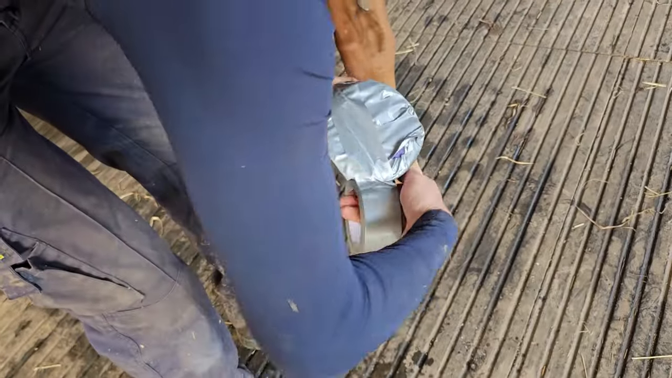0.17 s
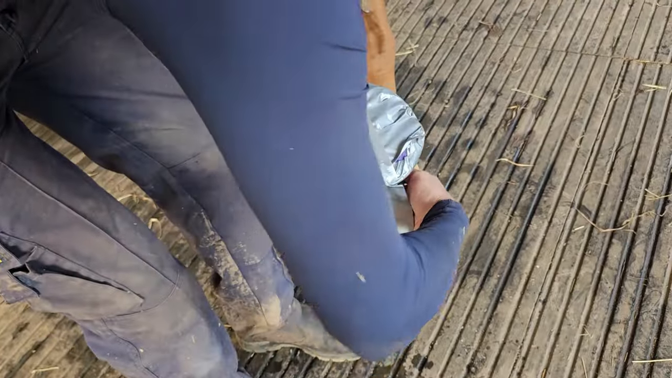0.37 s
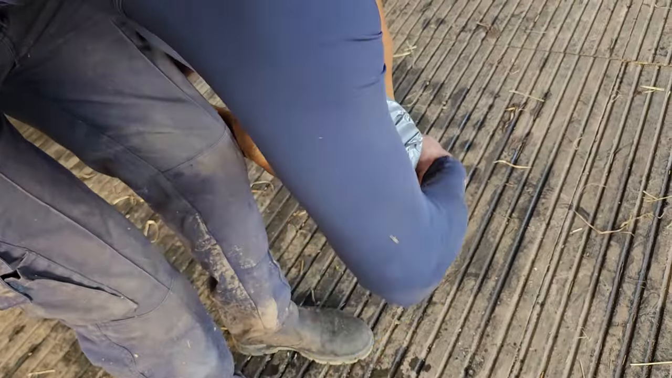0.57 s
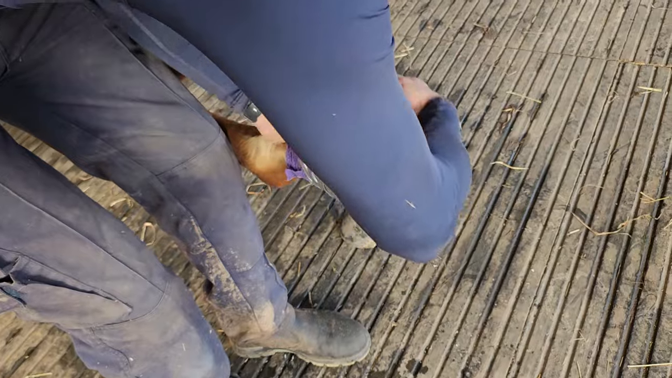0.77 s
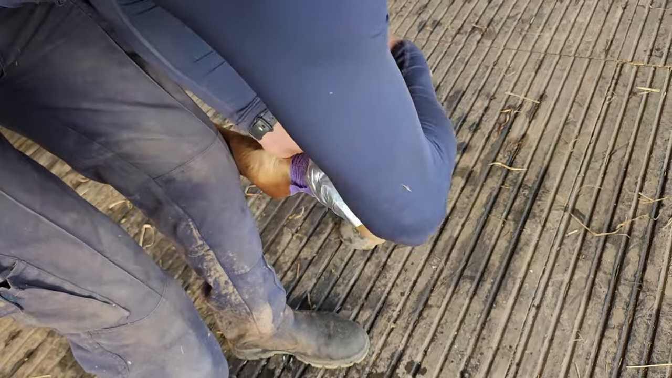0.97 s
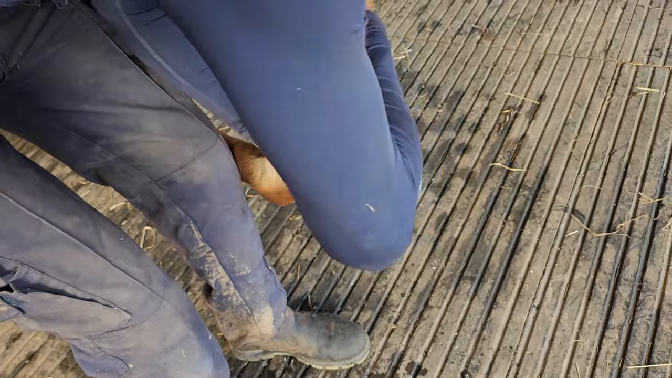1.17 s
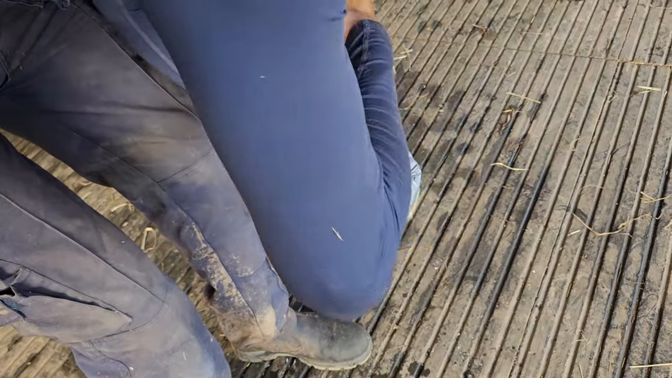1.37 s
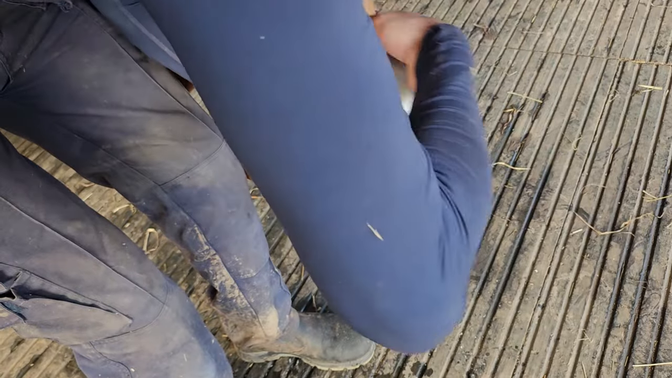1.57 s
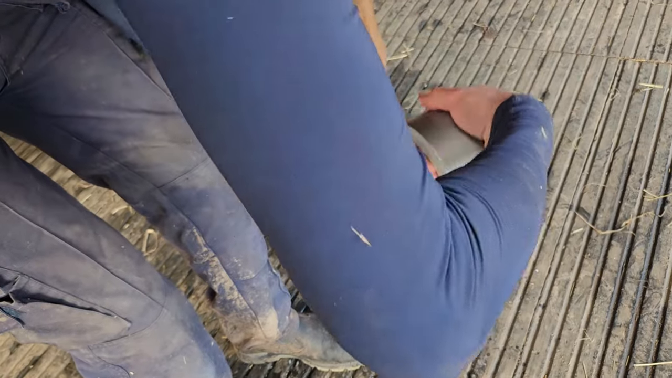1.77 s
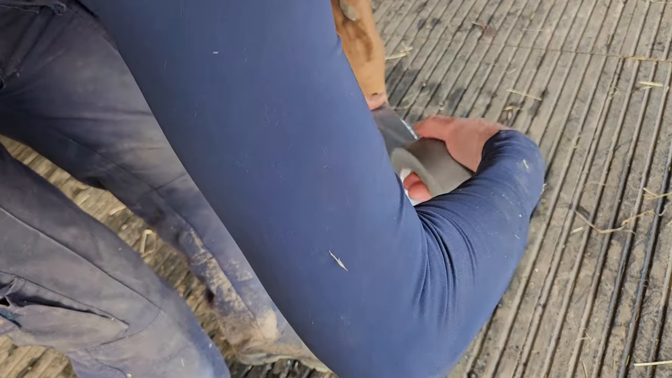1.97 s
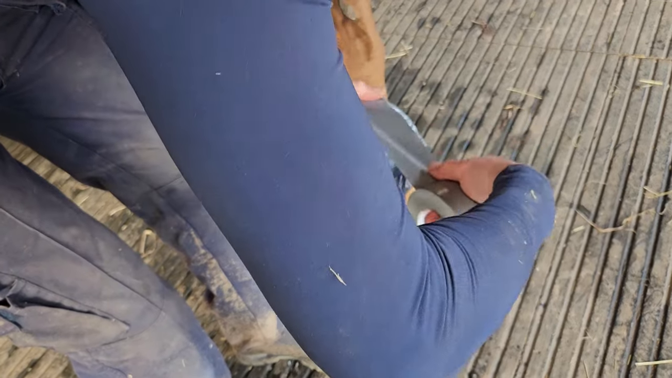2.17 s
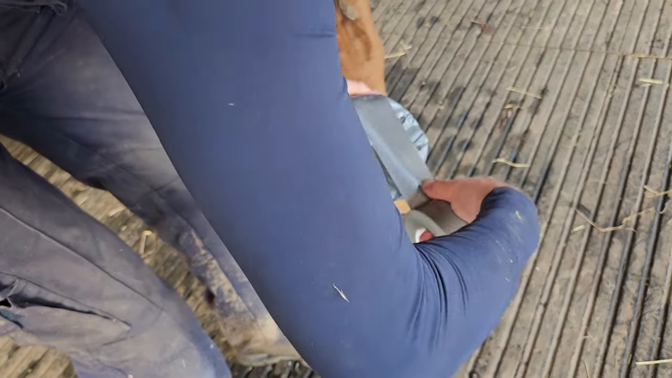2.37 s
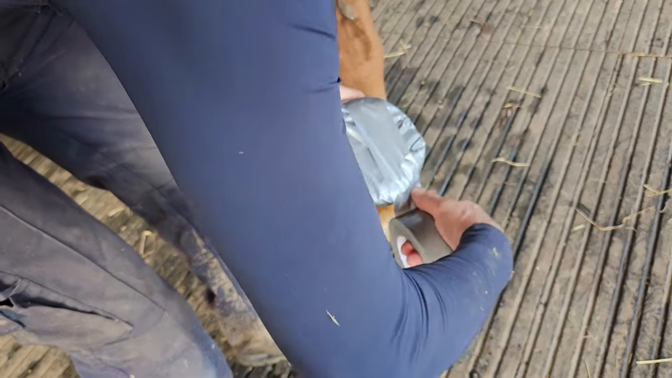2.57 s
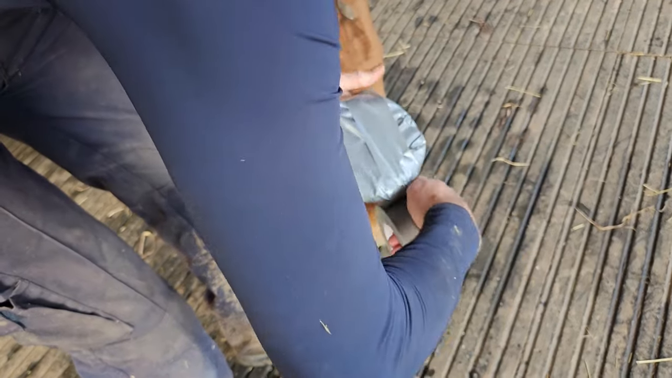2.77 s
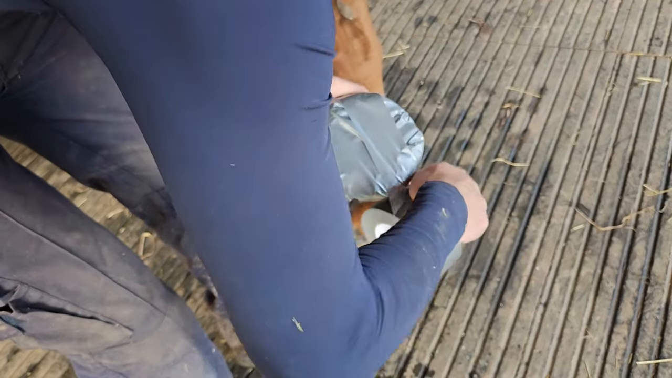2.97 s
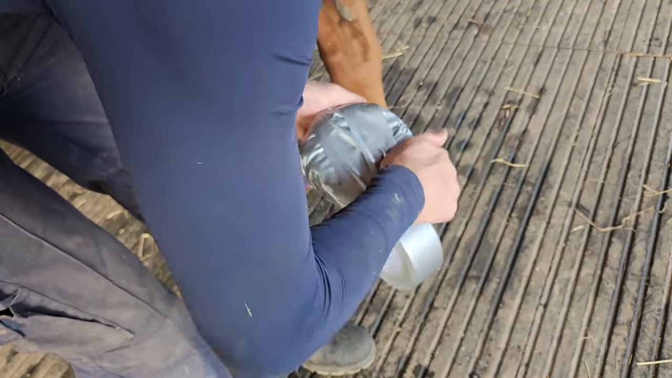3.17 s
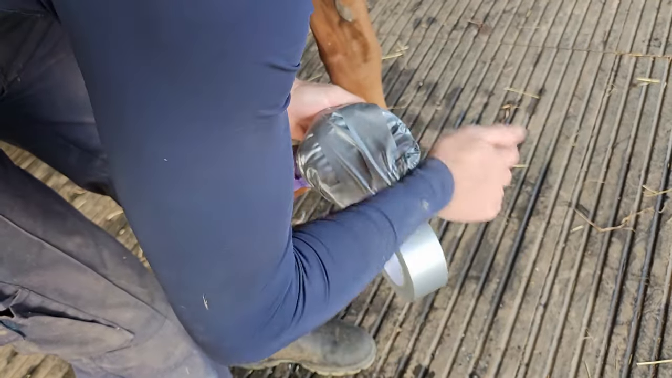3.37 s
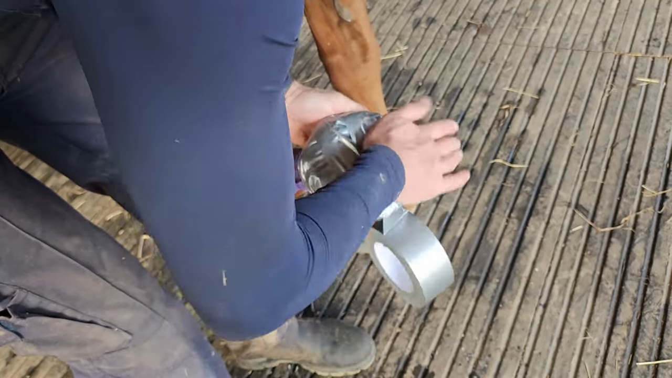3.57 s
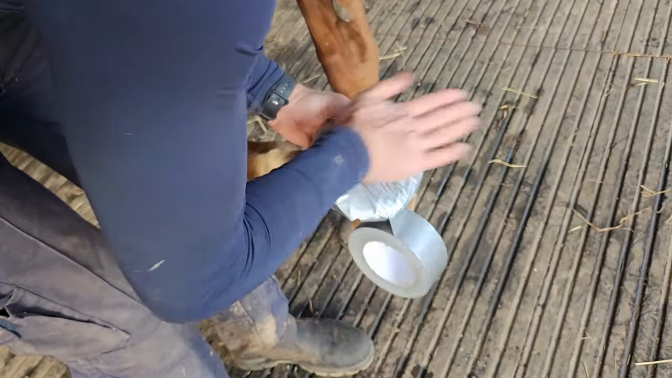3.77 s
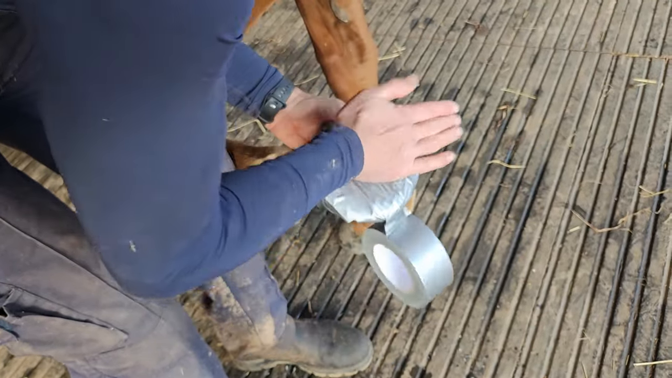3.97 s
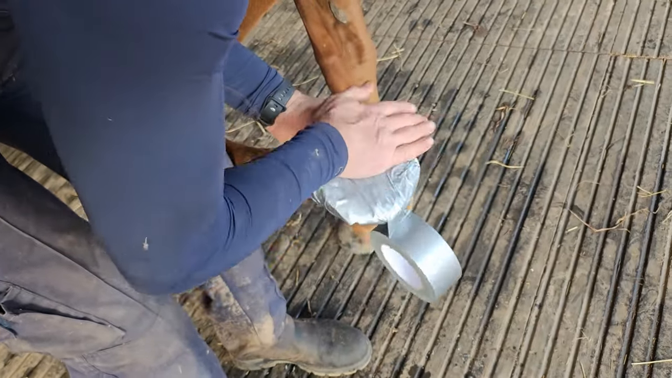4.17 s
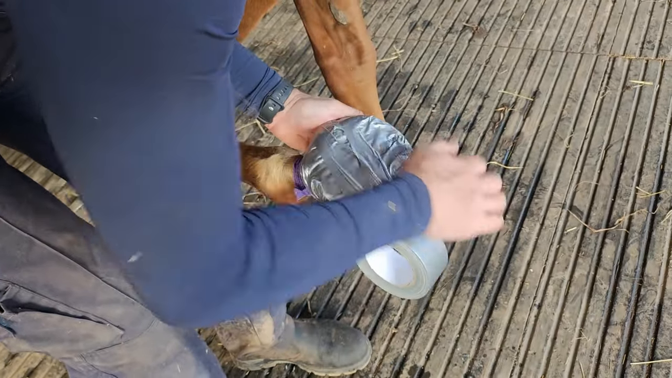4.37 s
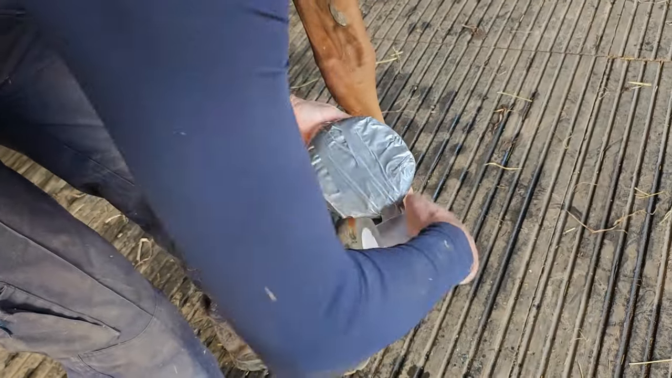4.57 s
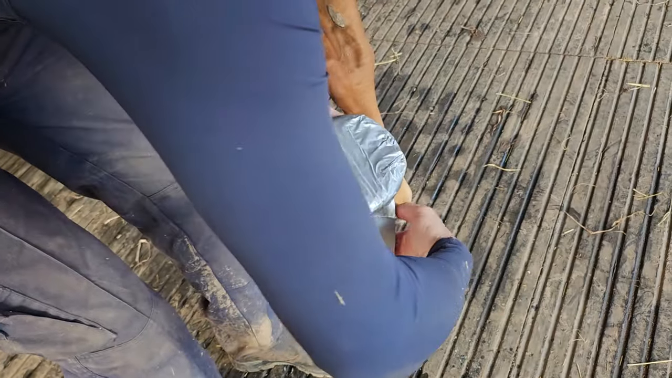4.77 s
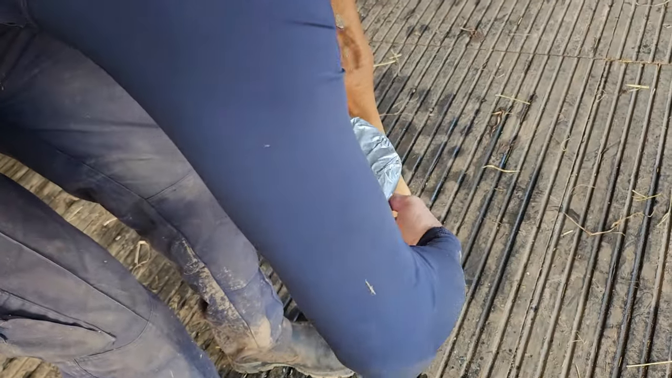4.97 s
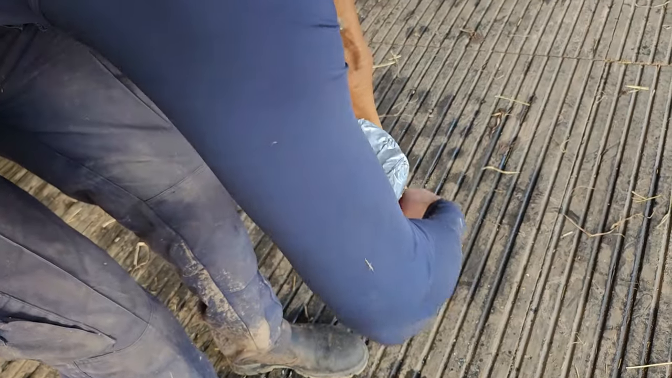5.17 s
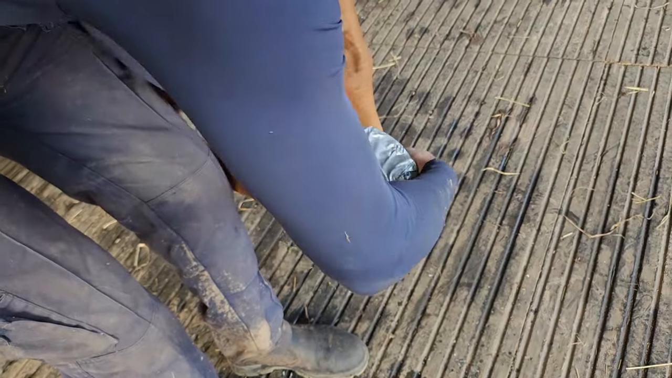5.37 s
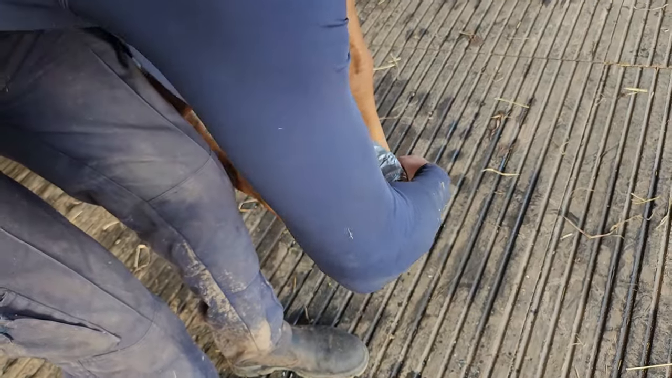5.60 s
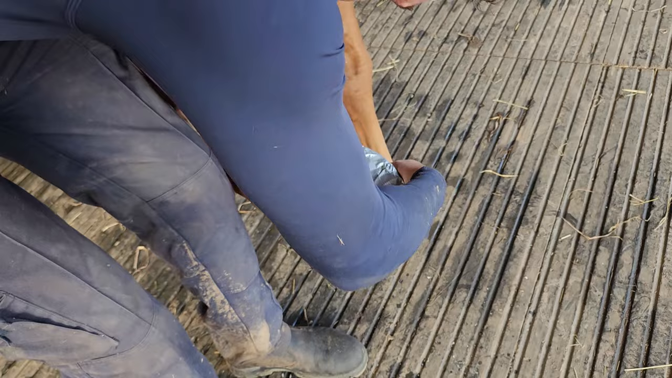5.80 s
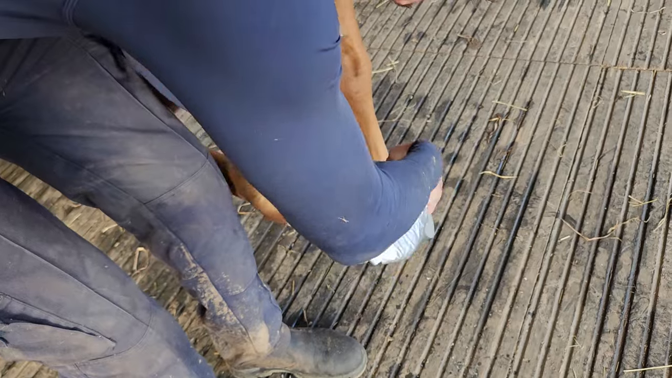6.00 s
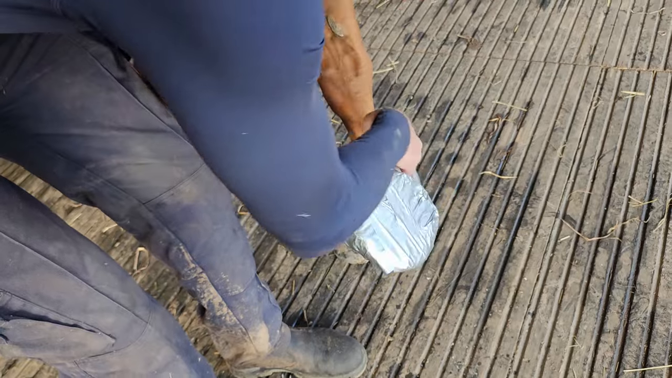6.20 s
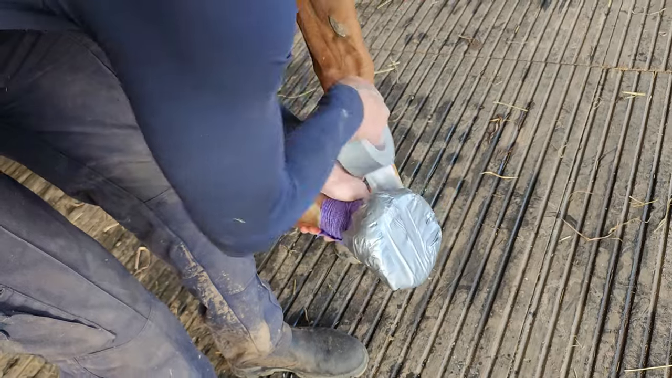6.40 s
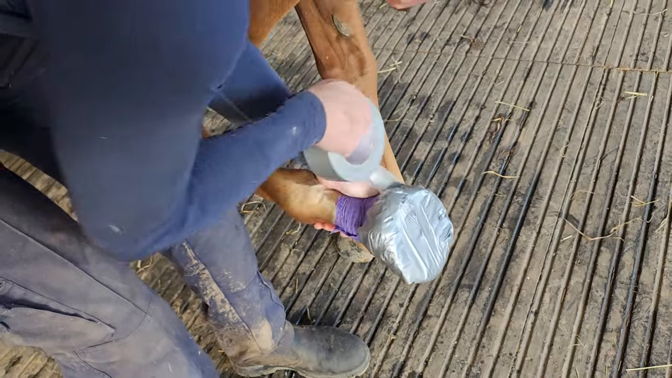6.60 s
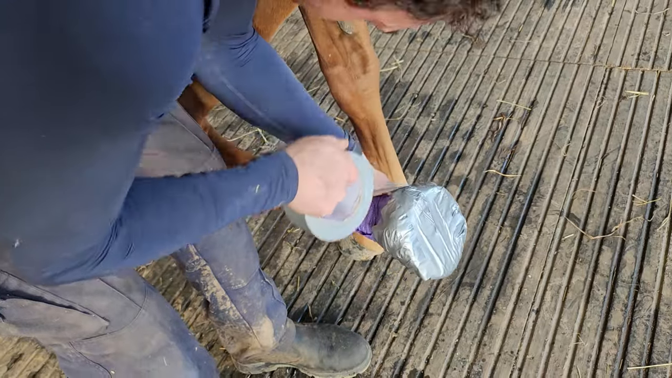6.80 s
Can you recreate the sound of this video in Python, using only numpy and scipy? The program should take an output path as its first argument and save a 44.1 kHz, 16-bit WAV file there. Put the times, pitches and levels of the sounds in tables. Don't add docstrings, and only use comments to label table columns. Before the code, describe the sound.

Close, rough ripping of sticky tape comes in uneven bursts, broken by a few pats on the wrap, cloth rustle and boot shuffle.

```python
import sys
import numpy as np
from scipy import signal
from scipy.io import wavfile
from scipy.ndimage import uniform_filter1d

SR = 44100
rng = np.random.default_rng(int(sys.argv[2]) if len(sys.argv) > 2 else 0)


def int16_out(signal):
    q = np.round(np.clip(np.atleast_2d(signal).T, -1, 1) * 32767)
    wavfile.write(sys.argv[1], SR, q.astype(np.int16))


def volts_from_db(level):
    exponent = np.asarray(level, float) / 20
    return 10 ** exponent


N = 301644


def evened(x):
    return x / np.sqrt(np.mean(x ** 2) + 1e-20)


def read(points, hz):
    f, value = np.transpose(points)
    return np.interp(np.log(hz + 1), np.log(f + 1), value)


def add(mix, s, sound):
    part = mix[round(s * SR):][:len(sound)]
    part += sound[:len(part)]


def band(x, lo_hz, hi_hz):
    return signal.sosfilt(signal.butter(2, [lo_hz, hi_hz], "band", fs=SR, output="sos"), x)


def colour(points, size=2048):
    level_db = np.maximum(read(points, abs(np.fft.fftfreq(size, 1 / SR))), -100)
    log_gain = np.log(volts_from_db(level_db))
    return np.fft.ifft(np.exp(np.conj(signal.hilbert(log_gain)))).real[:size // 2]


def resonate(x, hz, width):
    turn = np.exp(2j * np.pi * np.cumsum(hz * np.ones(len(x))) / SR)
    r = np.exp(-np.pi * width / SR)
    return 2 * (turn * signal.lfilter([1 - r], [1, -r], x / turn)).real


def swell(s, rise, fall):
    t = np.arange(N) / SR
    return volts_from_db(-20 * np.maximum((s - t) / max(rise, .005), (t - s) / max(fall, .005)))


# peak_s, rise_s, fall_s, rustle_db, shuffle_db
MOVES = [(.068, 0.091, 0.034, -47.5, -85), (.178, 0.067, 0.18, -52, -43), (.39, 0.076, 0.06, -42, -56),
         (1.3, 1.8, 1.4, -64, -49.5), (2.3, 0.19, 0.58, -46, -49), (2.62, 0.19, 0.36, -54, -54.5),
         (2.9, 0.23, 0.14, -70, -47.5), (3.31, 0.092, 0.32, -51.5, -43), (3.561, 0.0069, 0.055, -51, -37.5),
         (3.75, 0.2, 0.21, -40.5, -43.5), (3.904, 0.013, 0.075, -43, -24.5), (3.96, .06, 0.39, -44.5, -35),
         (4.217, 0.016, 0.2, -45, -40), (4.579, 0.1, 0.25, -55, -76), (4.86, 0.089, 0.18, -58, -52),
         (4.96, 0.075, 0.47, -64.5, -43.5), (5.05, 0.38, 0.17, -43, -67), (5.551, 0.12, 0.67, -49.5, -65),
         (5.71, .25, 0.083, -61, -46), (5.974, 0.051, 0.098, -53, -39), (6.1, 0.13, 0.05, -42.5, -61),
         (6.35, 0.26, .06, -40, -38.5), (6.75, .4, 0.66, -70, -40.5)]
# frequency_hz, density_db (per Hz)
RUSTLE = [(300, -17.5), (600, -2), (1200, -3.5), (2500, -1.5), (5000, -5), (7000, -5), (10000, -12),
          (12000, -5), (15800, -15.5)]
# frequency_hz, density_db (per Hz)
RUMBLE = [(15, -58), (25, -10), (54, -8), (129, -4), (172, -3), (303, -14), (339, -21.5), (500, -19),
          (650, -49), (1100, -120)]
# frequency_hz, likeness (-1 to 1)
SAME = [(60, 0.81), (240, 0.98), (950, 0.34), (3770, 0.1), (15000, 0.46)]


def background():
    frames, hz = N // 128 + 6, np.fft.rfftfreq(512, 1 / SR)
    a, b, c, d, patches = rng.standard_normal((frames, 257, 5)).T
    patches = uniform_filter1d(patches, size=10, axis=0)
    patches = evened(uniform_filter1d(patches, size=12, axis=1))
    flicker = evened(uniform_filter1d(rng.standard_normal(frames), size=3))
    same = np.clip(read(SAME, hz), -1, 1)[:, None]
    left = a + 1j * b
    right = same * left + np.sqrt(1 - same ** 2) * (c + 1j * d)
    z = np.array([left, right]) * volts_from_db(1.0 * patches + 1.1 * flicker)
    hiss = signal.istft(z, nperseg=512, noverlap=384)[1][:, :N]
    rustle = evened(signal.oaconvolve(hiss, colour(RUSTLE)[None])[:, :N])
    loudness, shuffling = np.full(N, volts_from_db(-65.5)), np.full(N, volts_from_db(-87.5))
    for s, rise, fall, rustle_db, shuffle_db in MOVES:
        shape = swell(s, rise, fall)
        shuffling += volts_from_db(shuffle_db - 1.0) * shape
        loudness += volts_from_db(rustle_db - 3.5) * shape
    low = signal.oaconvolve(hiss, colour(RUMBLE, size=16384)[None])[:, :N]
    lumps = volts_from_db(2.1 * evened(uniform_filter1d(rng.standard_normal(N), size=4000)))
    rumble_level = volts_from_db(-76) + volts_from_db(-15.5) * shuffling ** 0.74
    rumble = lumps * rumble_level * evened(band(low, 22, 118))
    shuffle = shuffling * evened(band(low, 114, 480))
    return loudness * rustle + rumble + shuffle


# peak_s, rise_s, fall_s, pitch_hz, width_hz, level_db
WHINE = (4.56, .2, .1, 1340, 70, -71)


def whine():
    s, rise, fall, hz, width, db = WHINE
    whistle = evened(resonate(rng.standard_normal(N), hz, width))
    return volts_from_db(db) * np.minimum(2 * swell(s, rise, fall), 1) * whistle


# frequency_hz, t60_s
STABLE = [(150, 0.8), (600, 0.61), (2000, 0.69), (6000, 0.6), (14000, 0.39)]
# frequency_hz, tail_db
STABLE_DB = [(150, -29), (500, -27), (1500, -25.5), (5000, -21), (14000, -24)]
MONO_HZ = 648


def tail():
    taps = np.zeros((2, SR))
    at = np.arange(400, SR - 20, 20) + rng.integers(0, 20, (2, (SR - 401) // 20))
    np.put_along_axis(taps, at, rng.choice([-1., 1.], at.shape), 1)
    hz, t, z = signal.stft(taps, SR, nperseg=256)
    apart = (hz / np.hypot(hz, MONO_HZ))[:, None] ** 2
    right = apart * z[1] + np.sqrt(1 - apart ** 2) * z[0]
    z = np.array([z[0], right]) * volts_from_db(-60 * t / read(STABLE, hz)[:, None])
    z = z * np.minimum(t / 0.0034, 1)
    energy = (abs(z) ** 2).sum(2, keepdims=True).mean(0)
    z = z / np.sqrt(energy) * volts_from_db(read(STABLE_DB, hz))[:, None]
    return signal.istft(z, SR, nperseg=256)[1] / 15


def stable(x, turns_per_s=7.3):
    turn = 2 * np.pi * turns_per_s * np.arange(N) / SR
    shares = np.sin(turn), np.cos(turn)
    return sum(signal.fftconvolve((x * share)[None], tail(), axes=1)[:, :N] for share in shares)


# delay_ms, gain
BOUNCES = [
    [(.9, -0.37), (2.3, -0.5), (4.1, 0.66), (7.7, 0.11)],
    [(1.3, -0.26), (2.9, 0.87), (5.2, 0.28), (6.6, -0.43)],
]
# frequency_hz, left_minus_right_db
LEAN = [(60, -4.5), (110, 1.5), (200, 1.5), (380, 1.5), (700, 1), (1290, 3.5), (2380, -3.5), (4400, 0.5),
        (8120, -13), (15000, -3)]


def near(x, sway=0.114):
    treble = signal.lfilter(*signal.butter(2, 950 / (SR / 2), "high"), x)
    t, out = np.arange(N) / SR, np.zeros((2, N))
    for ear, side in enumerate((.5, -.5)):
        heard = x.copy()
        for ms, gain in BOUNCES[ear]:
            swing = np.sin(2 * np.pi * (rng.uniform(.5, 1.5) * t + rng.random()))
            lag = ms / 1000 * (1 + sway * swing)
            heard += gain * np.interp(t - lag, t, treble)
        out[ear] = signal.oaconvolve(heard, colour([(f, side * db) for f, db in LEAN]))[:N]
    return out


# frequency_hz, density_db (per Hz)
PEEL = [(240, -14.5), (400, -8), (537, -9), (768, -3), (1210, -1), (1340, -5), (1520, -5), (1750, -12.5),
        (2010, -4), (6870, -9), (9820, -14.5), (11700, -6.5), (15700, -13.5), (16400, -25)]


def snap(db, low_db, low_hz, fade_ms):
    t = np.arange(1500) / SR
    grit = rng.standard_normal(1500) * np.exp(-1000 * t / fade_ms) * np.minimum(t / 0.000058, 1)
    bright = band(signal.oaconvolve(grit, colour(PEEL))[:1500], 1240, 11400)
    dull = band(resonate(grit, low_hz, 600), 576, 5400)
    return volts_from_db(db + 3.5) * (bright / abs(bright).max() + volts_from_db(low_db) * dull / abs(dull).max())


# start_s, peak_db, low_part_db (relative), low_part_hz
CREASES = [(0.019, -38, -28, 1500), (0.1615, -39, -20, 2000), (0.3172, -43, -19, 980),
           (0.3311, -31, -38, 1000), (0.341, -27.5, -28, 1000), (0.3514, -26, -21, 1000),
           (2.6126, -41, -43, 1000), (2.7213, -35, 0.5, 770), (2.745, -40, -34, 1000),
           (2.9486, -33, -15, 984), (3.0989, -40, -9, 1995), (3.2264, -35, -7, 806),
           (3.3534, -35, -10, 1000), (3.364, -31, -3, 754), (3.4735, -35.5, -3, 1530),
           (3.7218, -32.5, -0.5, 1120), (4.0283, -25, -30, 2000), (4.0525, -31, -10, 2000),
           (4.2953, -37.5, 1, 1310), (4.3735, -43.5, 8.5, 2040), (4.7398, -32.5, -12.5, 1800),
           (5.9502, -30, -39, 1010), (6.02, -30.5, -17, 800), (6.039, -27.5, -37, 1000),
           (6.0646, -45, -24, 1000)]
# start_s, peak_db, low_part_db (relative)
RIPS = [
    (0.192, -42, -36),
    (1.119, -20.5, 4.5),
    (1.4867, -10, -9),
    (2.1013, -8.5, -4.5),
    (2.8758, -27, 8.5),
    (4.8662, -20, -47),
    (4.9264, -6.5, -30),
    (5.157, -8, -8),
    (5.212, -9, 2.5),
]


def creases_and_rips(hands):
    for s, db, low_db, low_hz in CREASES + [(*rip, 960) for rip in RIPS]:
        add(hands, s, snap(db, low_db, low_hz, fade_ms=0.89))


# frequency_hz, level_db, t60_s
THUD = [(194, 6.5, 0.029), (97, 3.5, 0.05), (294, -10, 0.04)]


def pat(db, thud_db):
    t = np.arange(6000) / SR
    thud = sum(volts_from_db(level - 60 * t / t60) * np.sin(2 * np.pi * hz * t) for hz, level, t60 in THUD)
    thud = thud * np.minimum(t / 0.0047, 1)
    slap = np.pad(snap(db, -1.0, low_hz=1000, fade_ms=2.6), (0, 4500))
    return slap - volts_from_db(db + thud_db + 16.0) * thud / abs(thud).max()


# start_s, slap_db (peak), thud_db (relative)
PATS = [
    (3.563, -27, -16.5),
    (3.899, -16, -9.5),
    (4.212, -21.5, -17),
]


def pats(hands):
    for s, db, thud_db in PATS:
        add(hands, s, pat(db, thud_db))


def stroke(start, length, peak_db, place, hum_db):
    u, place = np.linspace(0, 1, num=25), np.clip(place, .02, .98)
    rise = 6.5 * min(place / 0.16, 1) * np.maximum(1 - u / place, 0) ** 2.9
    fall = 12.5 * min((1 - place) / 0.52, 1) * np.maximum((u - place) / (1 - place), 0) ** 1.47
    hum_growth_db_per_s = 89.5
    hum = hum_db - hum_growth_db_per_s * length * (1 - u)
    return np.transpose([start + length * u, peak_db - rise - fall, hum])


# start_s, resonance_hz, slip_rate_hz
STRIP = [(.1, 2550, 174), (.39, 2530, 282), (.52, 1330, 360), (.64, 1460, 185), (.82, 1840, 240),
         (1.0, 2700, 274), (1.3, 2200, 197), (1.5, 2450, 260), (1.6, 1585, 253), (1.68, 1050, 140),
         (2.88, 880, 200), (3.95, 2360, 193), (4.93, 2400, 250), (5.16, 1760, 306), (5.4, 1460, 323),
         (6.11, 1850, 257), (6.67, 2380, 171), (6.75, 1300, 164)]
PATCHES = [1400, 2700, 3900, 5600, 11500]


def pull(rows, chance, jitter=.5, focus=0.58, jerk=0.78):
    s, *columns = np.transpose(rows)
    t = np.arange(s[0], s[-1] + .04, 1 / SR)
    peel_db, hum_db = (np.interp(t, s, c) for c in columns)
    when, *strip_columns = np.transpose(STRIP)
    strip_hz, rate = (np.interp(t, when, c) for c in strip_columns)
    boom_db = hum_db - peel_db
    ring_db = 2.5 + 0.27 * boom_db + np.log2(strip_hz / 1500)
    pulling = np.clip(np.minimum(t - s[0], s[-1] - t) / .001, 0, 1)
    wander, size, threads, place = chance[round(s[0] * SR):][:len(t)].T

    uneven = np.exp(jitter * evened(uniform_filter1d(wander, size=200)) / 2)
    turns = np.cumsum(rate * uneven) / SR
    slips = (np.diff(np.floor(turns), prepend=-1) > 0) * volts_from_db(2.4 * np.clip(size, -2, 1.6))
    tear_ms = 2.1
    tearing = evened(signal.lfilter([1], [1, -np.exp(-1000 / (tear_ms * SR))], slips))
    creep = .3 * volts_from_db(-0.32 * np.clip(boom_db - 1.5, -25, 10))
    spray = tearing + creep
    which = (1000 * abs(place)).astype(int) % len(PATCHES)
    rung = sum(resonate(slips * (which == k), hz, 0.35 * hz) for k, hz in enumerate(PATCHES))
    drive = evened(spray * threads) - .45 * evened(slips) - .5 * evened(rung)

    rasp = signal.oaconvolve(drive, colour(PEEL))[:len(t)]
    body = band(rasp, 284, 3340)
    lengthwise = evened(resonate(resonate(drive, strip_hz, 1400), strip_hz, 1500))
    crosswise = evened(resonate(drive, 3860, 1200))
    modes = lengthwise + volts_from_db(-5.5) * crosswise
    strip = evened(evened(body) * (1400 / strip_hz) ** 1.07 + focus * modes)

    hum_hz = np.clip(rate, 205, 320)
    push = evened(resonate(slips - slips.mean(), hum_hz, 210.0))
    tremor_db = .8 * evened(uniform_filter1d(wander, size=500))
    start_jerk = 1 + jerk * np.exp((s[0] - t) / 0.0012)
    level = volts_from_db(peel_db + tremor_db) * pulling * start_jerk
    boom = resonate(resonate(push * level * volts_from_db(boom_db + 0.5), hum_hz, 285), hum_hz, 450)
    bright = volts_from_db(-1.5) * evened(band(rasp, 1820, 17400))
    return s[0], level * (bright + volts_from_db(ring_db + 1.5) * strip) + band(boom, 194, 412)


# start_s, peel_db, roll_hum_db
DRAW = [
    (.639, -19.5, -45),
    (.675, -23.5, -32),
    (.817, -26.5, -37),
    (.931, -22, -47.5),
    (1.005, -22, -38),
    (1.079, -24.5, -34.5),
]
# start_s, length_s, peak_db, peak_place (0-1), end_hum_db
PULLS = [(0.04, 0.022, -29.5, 0.44, -84), (.086, 0.017, -30, 0.22, -57), (0.189, 0.018, -24, 0.7, -83),
         (0.392, .213, -20, 0.32, -37.5), (1.12, 0.012, -36, 0.2, -58), (1.148, 0.077, -23, 1, -31),
         (1.238, .02, -16.5, 0.3, -25.5), (1.261, 0.013, -26, 0.3, -34), (1.362, 0.026, -27, 0, -32.5),
         (1.386, 0.01, -19.5, 0, -23.5), (1.467, 0.031, -23.5, 0.6, -36),
         (1.513, 0.036, -21.5, 0.45, -27.5), (1.559, 0.035, -22, 0.36, -25),
         (1.596, 0.016, -30, 0.3, -40), (1.629, .014, -26.5, .05, -39), (1.654, .013, -32, 0.3, -44),
         (1.669, 0.12, -21.5, 0.71, -29), (1.802, 0.014, -23, 0.5, -25.5),
         (2.082, .1, -19.5, 0.66, -30), (2.841, 0.034, -36, 0.2, -51), (2.874, 0.018, -31, 0.04, -63),
         (3.945, 0.028, -27.5, 0.2, -59), (4.865, 0.012, -25.5, 0.6, -71),
               (4.895, 0.028, -20, 0.44, -55), (4.926, .011, -23, 0.35, -63), (5.153, 0.015, -21, 0.1, -44),
               (5.198, 0.18, -19, 0.67, -39), (5.425, .035, -27, 0, -40), (6.111, .188, -23.5, 0.48, -46),
               (6.384, .17, -23.5, 0.69, -30), (6.635, 0.15, -22, 0.78, -32), (6.822, 0.021, -29, .9, -50)]


def pulls(tape, tugs):
    chance = rng.standard_normal((N + SR, 4))
    add(tape, *pull(DRAW, chance))
    for row in PULLS:
        length_s = row[1]
        add(tugs if length_s < .036 else tape, *pull(stroke(*row), chance))


def scene():
    tape, tugs, hands = np.zeros((3, N))
    pulls(tape, tugs)
    creases_and_rips(hands)
    pats(hands)
    shielded = volts_from_db(-5) * tugs + volts_from_db(-10) * hands
    direct = near(tape + volts_from_db(-1.0) * tugs + hands)
    return direct + stable(tape + shielded) + background() + whine()


def band_limit(x):
    return signal.sosfilt(signal.butter(12, 17010, fs=SR, output="sos"), x)


def record(dry):
    heard = band(np.tanh(dry / 1.172) * 1.022, 66, 22000)
    heard = signal.oaconvolve(heard, signal.firwin(255, 15950, fs=SR)[None], "same")
    return band_limit(heard)


dry = scene()
out = record(dry)
int16_out(out)
```